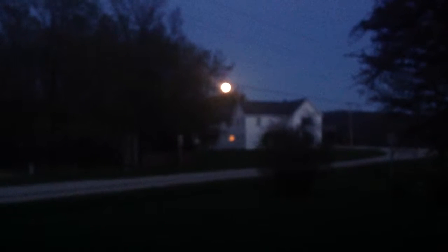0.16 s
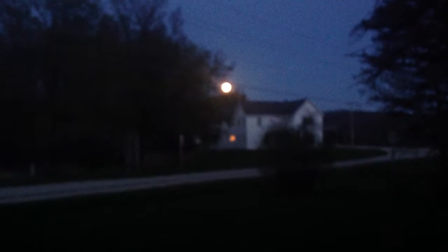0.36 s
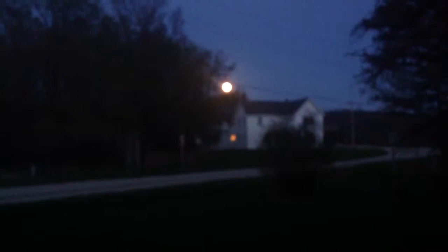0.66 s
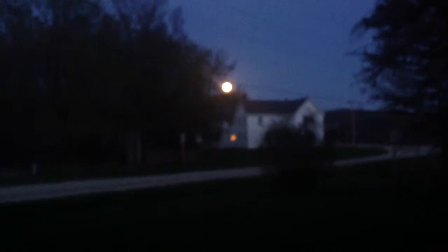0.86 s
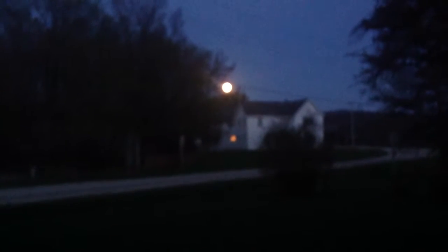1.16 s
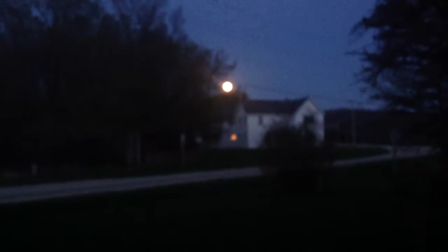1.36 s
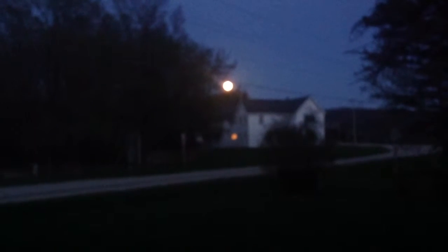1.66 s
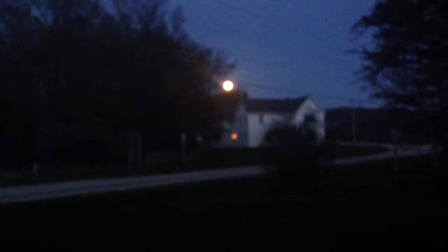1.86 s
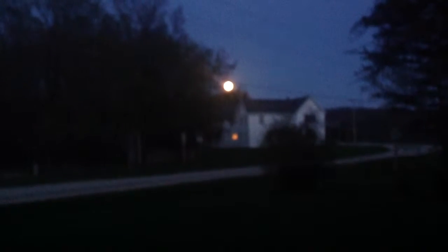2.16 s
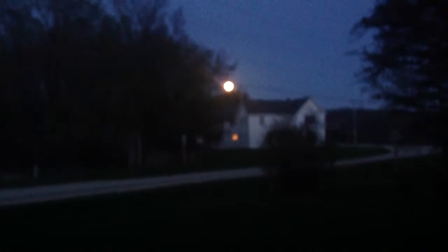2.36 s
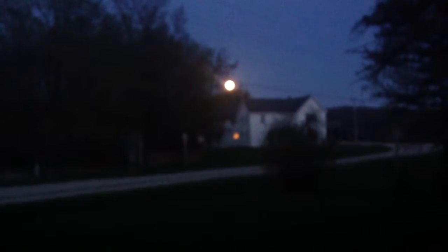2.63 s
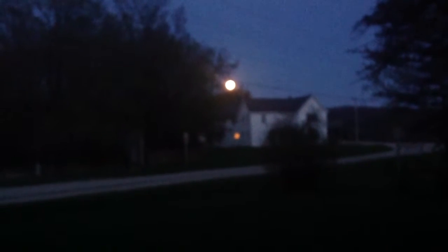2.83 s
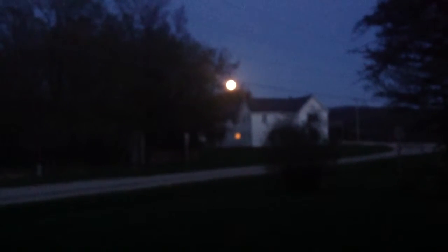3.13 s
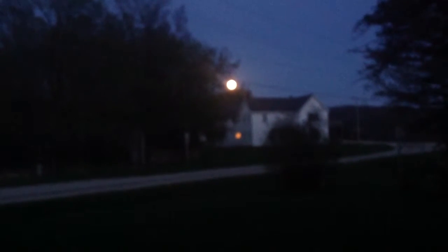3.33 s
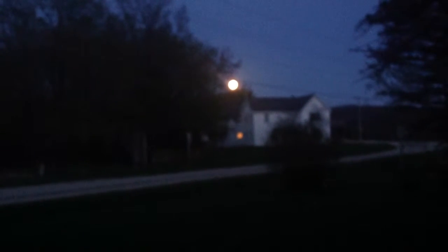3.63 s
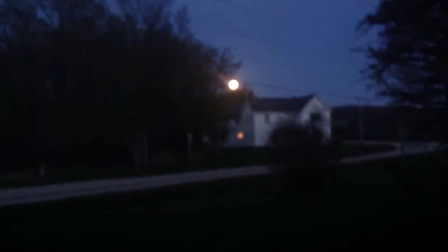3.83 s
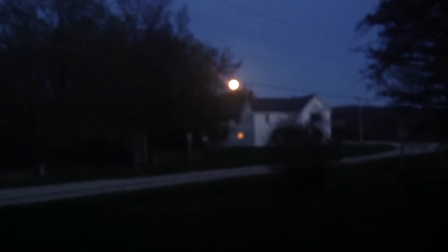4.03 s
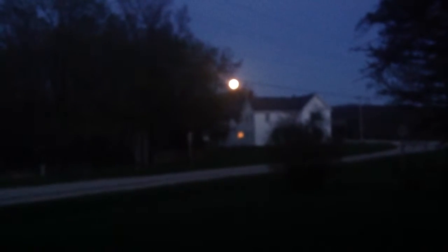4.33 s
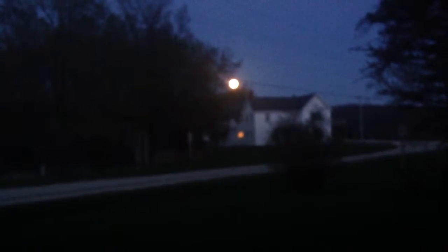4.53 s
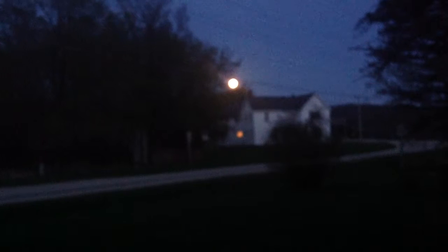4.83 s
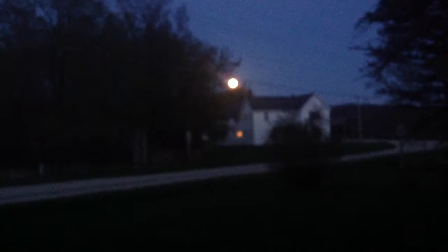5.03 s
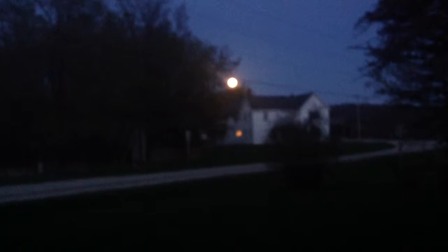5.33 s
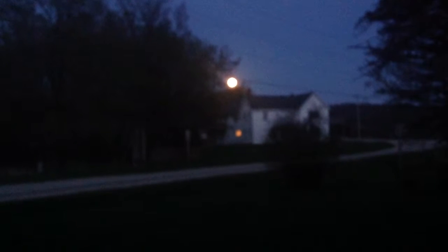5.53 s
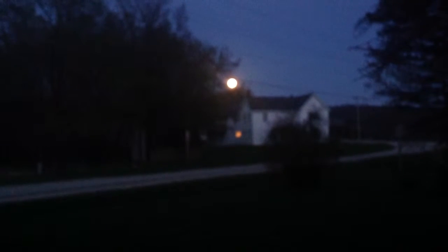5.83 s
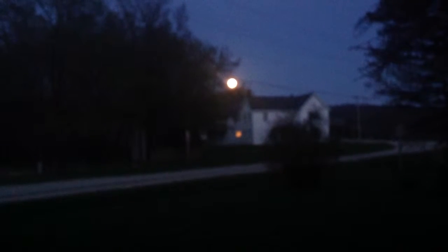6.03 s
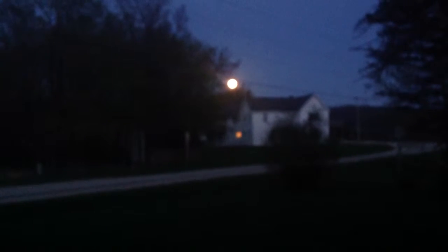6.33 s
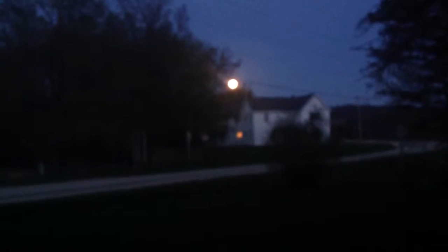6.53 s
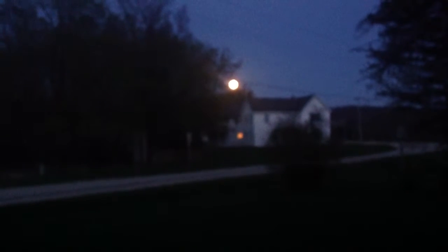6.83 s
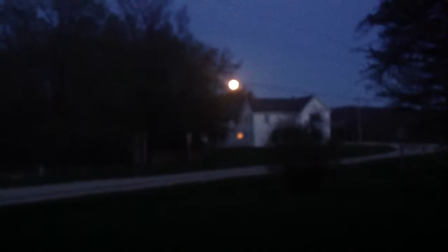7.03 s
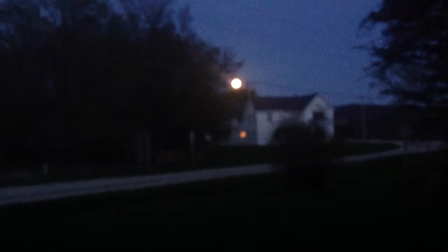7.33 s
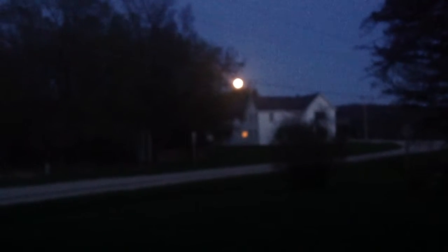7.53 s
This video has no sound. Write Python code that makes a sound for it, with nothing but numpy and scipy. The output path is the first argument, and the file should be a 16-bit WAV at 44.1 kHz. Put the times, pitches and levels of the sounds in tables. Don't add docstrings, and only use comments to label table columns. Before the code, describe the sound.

From 0 to about 7.7 seconds, a dense dusk chorus of small tree frogs runs without a break: short, clear whistles gliding upward, mostly between 2.7 and 3.5 kHz. Nearer frogs stand out at irregular moments, one repeating roughly every 0.6 seconds and a deeper one about every 0.9 until 4; a strong peep lands near 2.4. Behind them a far crowd blurs into shimmer, scattered by trees. Toads hold rough, rapidly pulsed trills around 1.7 kHz; the deepest fade after 4.4, while other low and high ones swell from about 4 to 7. A distant bird twitters quickly at 0.2-1.1, faintly near 2.2, again at 3.3-3.8, and higher at 6.6-7.1. A finger taps the microphone casing at 1.4, more lightly at 4.3, with dull touches at 5.2 and 6.0 and a deep faint thud at 7.5. Low traffic hum and hiss persist.

```python
import sys
import numpy as np
from scipy import signal
from scipy.fft import rfft, irfft, next_fast_len
from scipy.io import wavfile
from scipy.ndimage import map_coordinates

SR = 44100
rng = np.random.default_rng(int(sys.argv[2]) if len(sys.argv) > 2 else 0)


def how_loud(loudness_db):
    steps = np.asarray(loudness_db, float) / 20
    return 10 ** steps


def to_wav(sig):
    pcm = np.clip(np.atleast_2d(sig), -1, 1) * 32767
    pcm = np.round(pcm).astype(np.int16)
    wavfile.write(sys.argv[1], SR, pcm.T)


N = 339129


def unit(x):
    return x / np.sqrt(np.mean(x ** 2) + 1e-20)


def curves(rows):
    s, *columns = np.transpose(rows)
    return [np.interp(np.arange(N) / SR, s, column) for column in columns]


def wobble(rate):
    coarse = np.arange(0, N + 256, 256)
    knots = rng.standard_normal(800)
    return np.interp(np.arange(N), coarse, map_coordinates(knots, [coarse * rate / SR]))


def echoes(x, t60):
    hop = 8192
    t = np.arange(2 * hop + hop // 2) / SR
    pieces = np.lib.stride_tricks.sliding_window_view(np.pad(x, (hop, 2 * hop)), 2 * hop)[::hop]
    window = np.sin(np.pi * np.arange(2 * hop) / (2 * hop))
    tails = rng.standard_normal((len(pieces), len(t))) * how_loud(-60 * t / t60) * (1 - np.exp(-t / 0.023))
    wet = signal.fftconvolve(pieces * window, tails / np.linalg.norm(tails[0]), axes=1)
    where = hop * np.arange(len(pieces))[:, None] + np.arange(wet.shape[1])
    return np.bincount(where.ravel(), wet.ravel())[hop:hop + N]


def whistles(rows, attack, release, bend, fade_db):
    out = np.zeros(N + 2 * SR)
    for s, length, hz, rise_hz, db in rows:
        t = np.arange(int((attack + length + 2.3 * release) * SR)) / SR - attack
        along = np.clip(t / length, 0, None)
        swell = np.clip(.5 + t / attack / 2, 0, 1) ** 2
        swell = swell * np.exp(-(np.clip(t - length, 0, 1) / release) ** 2)
        turns = hz * t + rise_hz * length * along ** (bend + 1) / (bend + 1)
        note = how_loud(db - fade_db * along) * swell * np.sin(2 * np.pi * turns)
        out[SR + round((s - attack) * SR):][:len(t)] += note
    return out[SR:SR + N]


def peeper_group(low_hz, high_hz, rise_hz, count):
    rows = []
    for pitch, build, size, period, start, far in rng.random((count, 6)):
        times = (np.arange(-1, 13) + start) * (.62 + .3 * period)
        hz = low_hz + (.6 * pitch + .4 * build) * (high_hz - low_hz)
        length, rise = .07 + 0.04996 * size, rise_hz * (0.4488 + .8 * size)
        for s, (late, loud) in zip(times, rng.standard_normal((len(times), 2))):
            if s < N / SR:
                rows.append((s + .03 * late, length, hz, rise, 1.5 * loud - 6 * far))
    dry = whistles(rows, attack=.02, release=0.012, bend=1.194, fade_db=9)
    return unit(dry + how_loud(-2.0) * echoes(dry, t60=0.85))


def peepers():
    # start in seconds, start pitch in Hz, peak level in dB.
    # One deep frog calling about every 0.9 s, with a few strays
    deep_calls = [(0.461, 2470, -62), (1.33, 2510, -61.5), (2.245, 2516, -58), (3.214, 2503, -62),
                  (4.145, 2504, -62.5), (4.98, 2470, -73), (3.33, 2450, -67), (4.55, 2440, -70),
                  (5.92, 2590, -63)]
    held_calls = [(.48, 2690, -53), (1.075, 2690, -48), (1.8, 2710, -48), (2.555, 2720, -47),
                  (3.09, 2700, -48), (3.715, 2690, -49), (4.305, 2700, -49), (4.89, 2716, -48),
                  (5.48, 2690, -48), (6.065, 2714, -49), (6.585, 2766, -53), (6.985, 2680, -50.5),
                  (7.57, 2730, -52)]
    low_calls = [(.01, 2720, -59), (.115, 2590, -51), (.294, 2700, -57), (.86, 2720, -49),
                 (1.152, 2790, -46), (1.54, 2730, -52), (2.898, 2700, -55), (3.47, 2680, -67),
                 (4.055, 2750, -50), (4.475, 2710, -54), (4.74, 2710, -59), (5.06, 2640, -56),
                 (6.121, 2730, -65), (6.781, 2690, -50), (7.308, 2700, -51)]
    mid_calls = [(.005, 2970, -48), (0.407, 2835, -45.5), (.569, 2920, -50), (0.619, 3150, -48.5),
                 (.703, 2991, -47), (1.267, 3050, -46), (1.302, 3180, -45.5), (1.355, 3093, -51),
                 (1.84, 2810, -48), (2.03, 3030, -47), (2.195, 3080, -52), (2.41, 2956, -40),
                 (2.689, 3230, -51), (2.758, 2910, -51), (3.302, 2844, -44.5), (3.456, 3060, -47.5),
                 (3.58, 3080, -59), (3.966, 3290, -51), (4.699, 3000, -45.5), (4.785, 2775, -48),
                 (4.869, 2880, -62), (5.259, 3020, -52), (5.503, 2838, -49), (5.969, 3050, -46),
                 (6.066, 2830, -53), (6.35, 2963, -48), (6.77, 3084, -48.5), (6.824, 2814, -49),
                 (7.233, 3086, -48.5), (7.512, 2844, -45.5)]
    high_calls = [(.175, 3350, -53), (.449, 3460, -62), (.903, 3370, -57), (1.0, 3440, -58),
                  (1.52, 3450, -61), (1.721, 3390, -60.5), (2.0, 3450, -53), (2.504, 3340, -63),
                  (2.659, 3500, -59), (3.233, 3500, -58), (3.302, 3370, -53), (3.831, 3450, -59),
                  (4.036, 3290, -62.5), (4.235, 3350, -61), (4.5, 3420, -60), (4.984, 3390, -60),
                  (5.17, 3480, -57), (5.493, 3280, -56), (5.677, 3397, -62), (6.4, 3400, -57),
                  (6.55, 3400, -64), (6.884, 3340, -53), (7.0, 3330, -60), (7.12, 3420, -54),
                  (7.588, 3420, -57)]
    # length in seconds, rise in Hz, bend (over 1 lingers low),
    # fade along the call in dB.
    voices = [
        (.155, 290, 1.4, -2),
        (.09, 200, 2.2, 13),
        (.08, 200, 1.25, 4),
        (.075, 210, 1.2, 4),
        (.07, 240, 1.1, 7),
    ]
    # lowest start in Hz, highest start in Hz, rise in Hz, share in dB.
    crowds = [
        (2720, 3290, 290, 0),
        (3252, 3440, 290, -22),
    ]
    crowd_counts = (90, 24)
    # time in seconds, level in dB.
    eagerness = [(0.0, -50), (0.04, -50.5), (0.9, -49.5), (0.96, -54), (1.28, -50), (1.54, -51), (1.9, -48),
                 (1.99, -54.5), (2.03, -50), (6.4, -50), (6.47, -52.5), (6.9, -49.5), (6.94, -54),
                 (6.98, -46.5), (7.15, -51), (7.5, -53), (7.54, -50), (7.69, -52.5)]

    near = np.zeros(N)
    tables = deep_calls, held_calls, low_calls, mid_calls, high_calls
    for table, (length, rise_hz, bend, fade_db) in zip(tables, voices):
        rows = [(s, length, hz, rise_hz, db) for s, hz, db in table]
        near = near + whistles(rows, .018, 0.0091, bend, fade_db)
    near = how_loud(-2.0 + 2.6 * wobble(40)) * near
    far = np.zeros(N)
    for (low_hz, high_hz, rise_hz, share_db), count in zip(crowds, crowd_counts):
        far = far + how_loud(share_db) * peeper_group(low_hz, high_hz, rise_hz, count)
    scatter = how_loud(-7) * echoes(near, t60=0.11) + how_loud(-2.0) * echoes(near, t60=1.0)
    return near + scatter + how_loud(curves(eagerness)[0]) * far


def toad(hz, rate, slip):
    beat = np.cumsum(rate * (1 + 0.0122 * wobble(3))) / SR + rng.random()
    part = beat % 1
    pulse = np.sin(np.pi * np.clip(part / 0.67, 0, 1)) ** 1.47
    pitch = hz * (1 + .0012 * wobble(1.2) + 0.043 * (part - .5))
    start = slip * np.cumsum(rng.standard_normal(600))
    tone = np.sin(2 * np.pi * np.cumsum(pitch) / SR + start[beat.astype(int)])
    return how_loud(0.95 * wobble(2.14)) * pulse * tone


def toad_level(usual_db, start, end, more_db):
    swell_s, sway_db = .12, 0.66
    t = np.arange(N) / SR
    risen = np.clip(np.minimum(t - start, end - t) / swell_s + .5, 0, 1)
    return usual_db + more_db * risen + sway_db * wobble(4)


def toads():
    # lowest pitch in Hz, highest pitch in Hz, pulses per second, echo in dB,
    # phase slip per pulse in radians, time of falling silent in seconds.
    groups = [
        (1345, 1420, 38.5, -3, 2.5, 4.4),
        (1505, 1575, 40, -1.5, 1.8, 9),
        (1600, 1800, 43, 1.5, 2.2, 9),
        (1826, 1826, 44.3, -2.5, 1.2, 9),
    ]
    group_counts = (2, 4, 10, 1)
    # usual level in dB, louder from in seconds, louder until in seconds, extra level in dB.
    group_levels = [
        (-69, 3.6, 4.3, 2.5),
        (-63.5, 4.68, 7.0, 3.5),
        (-57, .35, 4.9, 1.5),
        (-65.5, 3.95, 6.95, 5.5),
    ]

    out, t = np.zeros(N), np.arange(N) / SR
    levels = [toad_level(*row) for row in group_levels]
    for level_db, group, count in zip(levels, groups, group_counts):
        low_hz, high_hz, rate, echo_db, slip, quiet = group
        rates = rate * (1 + .1 * rng.standard_normal(count) * np.sign(np.arange(count)))
        dry = sum(toad(hz, r, slip) for hz, r in zip(np.linspace(low_hz, high_hz, count), rates))
        dying = how_loud(-60 * np.clip(t - quiet, 0, 9) / 1.8)
        out = out + how_loud(level_db + 1.5) * dying * unit(dry + how_loud(echo_db) * echoes(dry, t60=0.65))
    return out


def air():
    # frequency in Hz, spectral level in dB per Hz.
    noise_colour = [(25, -27), (50, -28.5), (100, -10.5), (150, -0.5), (174, 2), (200, 0), (400, -2),
                    (1200, -7), (2100, -7.5), (2500, -11), (4000, -14.5), (5000, -16.5), (6000, -18.5),
                    (10000, -21), (15500, -26)]
    # time in seconds, hum level in dB.
    hum_drift = [(0.0, -63.5), (1.35, -62.5), (1.58, -63.5), (2.46, -63), (3.75, -64), (5.48, -65),
                 (5.63, -65.5), (6.34, -64.5), (7.69, -65)]

    m = next_fast_len(N + 8192)
    hz = np.fft.rfftfreq(m, 1 / SR)
    f, v = np.transpose(noise_colour)
    colour = how_loud(np.interp(np.log(hz + 1), np.log(f), v))
    low = 1 / (1 + (hz / 2000) ** 4)
    hum, hiss = (irfft(rfft(rng.standard_normal(m)) * colour * part, m)[:N] for part in (low, 1 - low))
    return how_loud(curves(hum_drift)[0] + 1.02) * unit(hum) + how_loud(-67.0) * unit(hiss)


def bird():
    # start in seconds, peak level in dB, start pitch in Hz.
    bird_notes = [(0.1594, -64, 4920), (0.2497, -57, 4800), (0.3323, -57, 4720), (0.4536, -56, 4940),
                  (0.5294, -61, 4600), (0.5894, -54, 4840), (0.6598, -63, 4870), (0.7194, -57, 4670),
                  (0.7994, -64, 4930), (0.8894, -55, 4770), (1.0585, -62, 4800), (2.0994, -69, 4880),
                  (2.2294, -68, 4820), (2.4096, -66, 4770), (3.2794, -61, 5260), (3.375, -62, 4800),
                  (3.4584, -63, 4780), (3.5694, -60, 4830), (3.6997, -61, 5130), (3.8149, -60, 4760),
                  (6.628, -58, 5660), (6.7491, -55, 5650), (6.8763, -52.5, 5630), (7.0174, -55, 5650),
                  (7.1494, -68, 5630)]

    out, t = np.zeros(N + SR), np.arange(SR // 10) / SR
    for (s, db, hz), turn in zip(bird_notes, rng.random(len(bird_notes))):
        vibrato = 400 * np.sin(2 * np.pi * (105 * t + turn))
        pitch = .99 * hz + vibrato - 1300 * np.clip((t - .022) / 0.052, 0, 1)
        swell = np.exp(-((t - .016) / 0.0084) ** 2) + 0.45 * np.exp(-((t - .045) / 0.015) ** 2)
        note = how_loud(db - 8.5) * swell * np.sin(2 * np.pi * np.cumsum(pitch) / SR)
        out[round((s - .008) * SR):][:len(t)] += note
    return out[:N] + how_loud(-6) * echoes(out[:N], t60=0.25)


def taps():
    # start in seconds, peak level in dB, pitch in Hz.
    finger_taps = [
        (1.363, -43, 423),
        (4.305, -55, 482),
        (5.155, -61, 184),
        (5.969, -59, 230),
                   (7.482, -64, 119),
    ]

    out, t = np.zeros(N + SR), np.arange(SR // 10) / SR
    for s, db, hz in finger_taps:
        push = np.exp(-((t * hz - 3.6) / 0.95) ** 2)
        out[round(s * SR):][:len(t)] += how_loud(db - 0.5) * push * np.sin(2 * np.pi * hz * t)
    return out[:N]


def scene():
    return (peepers() + toads() + air() + bird() + taps())[None]


def band_limit(x):
    return signal.sosfilt(signal.butter(12, 15300, fs=SR, output="sos"), x)


def record(dry):
    return band_limit(dry)


dry = scene()
out = record(dry)
to_wav(out)
```